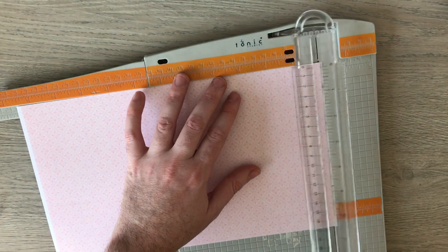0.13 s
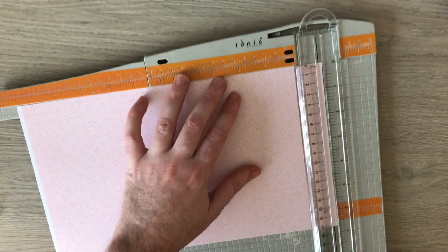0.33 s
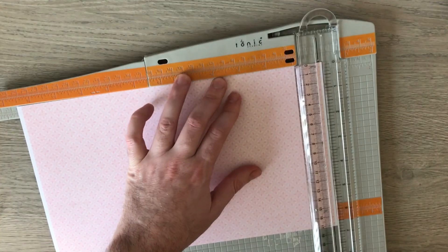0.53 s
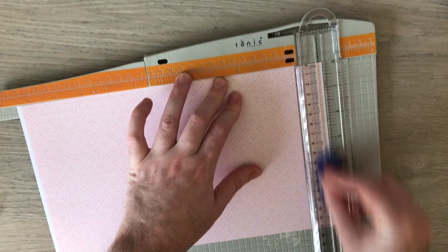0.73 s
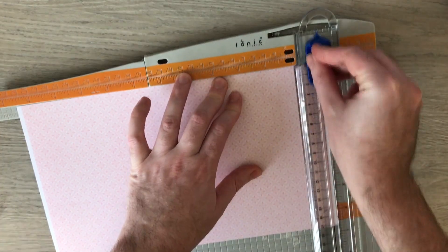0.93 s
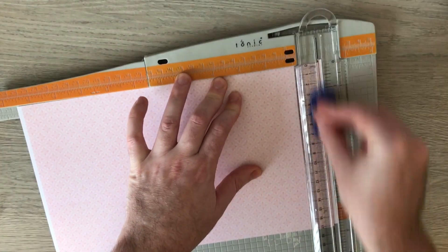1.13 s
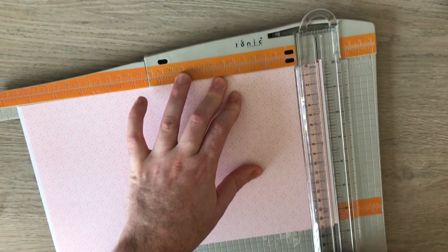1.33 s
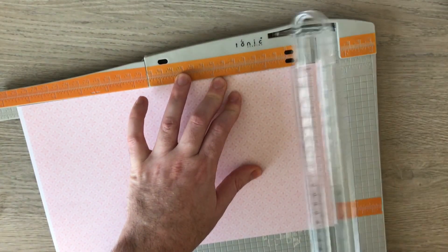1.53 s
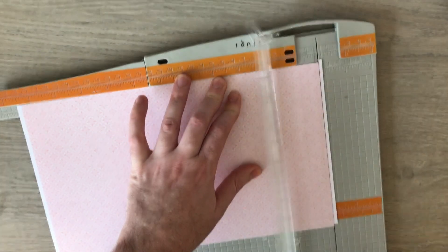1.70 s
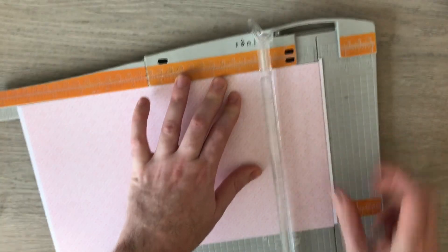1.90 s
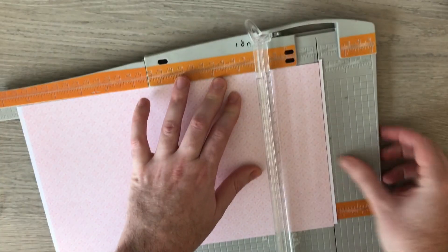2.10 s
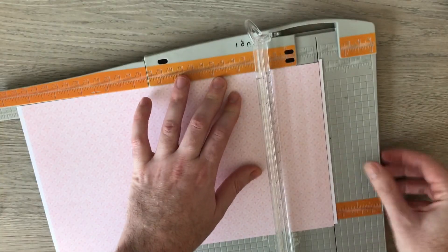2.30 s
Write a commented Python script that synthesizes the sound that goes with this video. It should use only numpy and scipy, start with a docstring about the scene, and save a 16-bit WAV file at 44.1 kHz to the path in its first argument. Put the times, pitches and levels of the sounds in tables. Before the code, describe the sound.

Paper trimmer, close up in a small room. A faint squeak at 0.03 s, then a loud plastic snap with table thump at 0.24. Soft rail rubbing from 0.4, a crisp tearing slice from 0.68 to 0.97, hissing return slide until 1.5 with small clicks near 1.4. Unlatching clatter and low boom around 1.65-1.8, then scraping and card crackles until 2.2, fading into quiet air.

```python
"""In a small room, on a wooden table, someone works a sliding-blade paper trimmer, heard from close above.
The plastic guide arm squeaks and snaps shut; the blade carriage runs up its rail, slices card and slides back.
The arm is unlatched and swung open with a rattle, the cut sheet is pulled aside, and the table top booms below.
Rubbing and cutting are made of many tiny random slips, knocks of short noise bursts that ring the plastic,
and the boom of decaying sine waves set going by noise."""
import sys
import numpy as np
from scipy import signal
from scipy.fft import rfft, irfft
from scipy.io import wavfile
from scipy.ndimage import uniform_filter1d

SR = 44100
rng = np.random.default_rng(int(sys.argv[2]) if len(sys.argv) > 2 else 0)


def master(y):
    """Save y as 16-bit WAV."""
    cut = np.clip(np.atleast_2d(y).T, -1, 1)
    pcm = np.round(cut * 32767)  # scale
    wavfile.write(sys.argv[1], SR, pcm.astype(np.int16))


N = 103635  # samples, 2.35 s


def undb(db):
    """Turn decibels into a gain."""
    return 10 ** (np.asarray(db) / 20)


def unit(x):
    """Scale a sound to an rms (average strength) of 1."""
    return x / np.sqrt(np.mean(x ** 2))


def curve(table, axis=1):
    """Draw a gain over time through one column of dB points, silent outside them."""
    rows = np.array(table)
    seconds = np.arange(N) / SR
    return undb(np.interp(seconds, rows[:, 0], rows[:, axis], left=-140, right=-140))


def response(points, peaks=(), tilt_db=0, size=4096):
    """Build the ringing of a body, with unit energy, from a tone colour, resonances and a treble tilt."""
    hz = np.maximum(np.arange(size // 2 + 1) * SR / size, 1)
    rows = np.array(points)
    db = np.interp(np.log(hz), np.log(rows[:, 0]), rows[:, 1])
    # the tilt, in dB per octave, acts above 1 kHz
    db = db + tilt_db * np.log2(np.maximum(hz, 1000))
    # bass falls away below half the first frequency
    db = db - 10 * np.log10(1 + (rows[0, 0] / hz / 2) ** 4)
    for centre, width, lift in peaks:
        db = db + lift / (1 + (2 * (hz - centre) / width) ** 2)
    # minimum phase: the ringing starts as promptly as it can and never before the blow
    cepstrum = irfft(np.log(undb(db)))
    h = irfft(np.exp(rfft(2 * cepstrum[:size // 2], size)))
    return h / np.sqrt(np.sum(h ** 2))


def through(x, h):
    """Pass a sound through an impulse response."""
    return signal.fftconvolve(x, h)[:len(x)]


def fade(t, t60):
    """Die away exponentially, by 60 dB in t60 seconds."""
    return np.exp(-np.log(1000) * t / t60)


def burst(t60_low, t60_high, size=22050):
    """Make dense ringing from noise, with separate decays below and above about 4 kHz."""
    t = np.arange(size) / SR
    noise = rng.standard_normal(size)
    low = signal.sosfiltfilt(signal.butter(1, 4000, fs=SR, output="sos"), noise)
    return low * fade(t, t60_low) + (noise - low) * fade(t, t60_high)


def even_burst(t60_low, t60_high, size=11025):
    """A short noise burst with its energy evened over frequency, so the tone colour stays steady."""
    spectrum = rfft(burst(t60_low, t60_high))
    power = uniform_filter1d(np.abs(spectrum) ** 2, size=200)
    return irfft(spectrum * np.sqrt(np.mean(power) / power))[:size]


def add(out, at, x):
    """Mix a sound in at a time in seconds."""
    i = int(at * SR)
    out[i:i + len(x)] += x[:N - i]


def walk(rate):
    """Wander smoothly at random, with rms 1, drawing new values at a rate per second."""
    k = max(int(SR / rate), 1)
    steps = np.repeat(rng.standard_normal(N // k + 1), k)[:N]
    return unit(uniform_filter1d(steps, k))


# Resonances of the plastic trimmer. Each row: frequency in Hz, width in Hz, lift in dB.
PLASTIC = [(559, 8.1, 6), (628.4, 7.8, 7), (716.8, 16, 12), (825, 73, 4.5), (1023, 79, 5), (1144, 60, 2),
           (1386, 110, 9), (1764, 99, 7), (1882, 40, 5), (2062, 87, 5.5), (2350, 60, 0.5), (2853, 79, 5),
           (3180, 210, 0.5), (3920, 90, -2.5), (4890, 120, -6), (5100, 200, 1), (5910, 250, 3),
           (8800, 430, 5.5)]


def friction(colour, rate, spread_db, uneven_db, uneven_rate):
    """Tiny slips of uneven size and pressure, at a rate per second, ring the trimmer."""
    sizes = undb(spread_db * rng.standard_normal(N))
    slips = (rng.random(N) < rate / SR) * rng.choice([-1, 1], N) * sizes
    pressure = undb(uneven_db * walk(uneven_rate))
    return unit(through(slips * pressure, response(colour, PLASTIC)))


def clicks(events, colour, treble_share):
    """Short contacts ring the plastic, each with its own brightness and length."""
    out = np.zeros(N)
    for at, db, tilt, t60 in events:
        contact = even_burst(t60, t60 * treble_share)
        add(out, at, undb(db) * through(contact, response(colour, PLASTIC, tilt)))
    return out


def patchy(x, depth_db, rate, count=9):
    """A moving contact favours now one band, now another, so the band levels wander."""
    out = x
    edges = np.geomspace(700, 11000, count + 1)
    for band in zip(edges[:-1], edges[1:]):
        part = signal.sosfiltfilt(signal.butter(2, band, "bandpass", fs=SR, output="sos"), x)
        out = out + part * (undb(depth_db * walk(rate)) - 1)
    return out


# Tone of the quiet air. Each row: frequency in Hz, relative level in dB.
AIR_COLOUR = [(45, -0.5), (90, -3.5), (200, -8.5), (400, -13.5), (800, -18.5), (1400, -19), (2500, -26),
              (5000, -27.5), (10000, -32), (15500, -33)]
AIR_DB = -64.5


def quiet_air():
    """Steady noise, strongest in the bass, fills the room."""
    return undb(AIR_DB) * unit(through(rng.standard_normal(N), response(AIR_COLOUR)))


TABLE_CUT_HZ = 90  # the table top radiates little below its lowest mode
# Ways the table top can ring. Each row: frequency in Hz, time to fade by 60 dB in seconds, relative level in dB.
TABLE = [(127, 0.16, -20.5), (131.2, 0.28, 0), (151, 0.033, -18.5), (210, .22, -2.5), (278.3, .14, -10)]


def table_ring(modes=TABLE):
    """One blow sets the table top ringing as a sum of fading sine waves."""
    t = np.arange(SR // 2) / SR
    ring = sum(undb(db) * np.sin(2 * np.pi * hz * t) * fade(t, t60) for hz, t60, db in modes)
    return signal.sosfilt(signal.butter(3, TABLE_CUT_HZ, "highpass", fs=SR, output="sos"), ring)


UPPER_MODES_HZ = 180  # where the upper modes begin
# Ringing of the table under the hands. Each row: time in seconds, lowest modes in dB, upper modes in dB.
BOOM = [(0, -60.5, -67.5), (.19, -73, -73.5), (.3, -42, -44.5), (.44, -72, -65.5), (.53, -52.5, -68),
        (.62, -57.5, -60.5), (.71, -36.5, -50), (.8, -50, -54.5), (.92, -54, -47), (.985, -39.5, -47),
        (1.1, -64, -64), (1.24, -43.5, -50.5), (1.45, -51, -64), (1.53, -56, -57.5), (1.63, -56, -65.5),
        (1.72, -30, -40), (1.9, -35.5, -41), (1.95, -38.5, -59), (2.0, -35, -38.5), (2.08, -37, -47),
        (2.115, -60, -39.5), (2.18, -40, -47), (2.34, -63.5, -66)]


def table_boom():
    """Handling keeps the table top ringing; where the hands press shifts the weight among its modes."""
    out = 0
    lowest = [m for m in TABLE if m[0] < UPPER_MODES_HZ]
    upper = [m for m in TABLE if m[0] >= UPPER_MODES_HZ]
    for column, modes in enumerate([lowest, upper]):
        ring = through(rng.standard_normal(N), table_ring(modes))
        # even out the random swells so that the curve sets the level
        swell = np.sqrt(uniform_filter1d(ring ** 2, size=2200) + 1e-9)
        out = out + curve(BOOM, axis=column + 1) * ring / swell
    return out


SQUEAK_AT_S, SQUEAK_LENGTH_S = .034, .028  # middle; length between points at a fifth of the peak
SQUEAK_HZ, SQUEAK_DB = 950, -44.5
SQUEAK_OCTAVE_DB, SQUEAK_RASP_DB = -21, -12  # relative to the squeak's main tone
SQUEAK_RING_DB, SQUEAK_RING_T60_S = -14.5, .3  # ring level, also relative to the main tone
# The arm brushing down on its hinge. Each row: time in seconds, level in dB.
SWING = [(0, -63), (.06, -71), (.1, -73.5), (.17, -77), (.195, -65), (.213, -58.5), (.24, -50),
         (.25, -72.5)]
# Tone of the hinge rub. Each row: frequency in Hz, relative level in dB.
HINGE_COLOUR = [(200, 0.5), (500, -6), (1000, 4.5), (1480, -4), (1750, -12.5), (2100, -10), (2700, -16.5),
                (5000, -23), (16000, -36.5)]


def hinge():
    """The arm comes down with a faint, wavering squeak that rings on, and a soft rub."""
    t = np.arange(N) / SR
    phase = 2 * np.pi * np.cumsum(SQUEAK_HZ * (1 + .012 * walk(200))) / SR
    rub = friction(HINGE_COLOUR, rate=2500, spread_db=5, uneven_db=2.5, uneven_rate=100)
    squeak = np.sin(phase) + undb(SQUEAK_OCTAVE_DB) * np.sin(2 * phase)
    squeak = squeak + undb(SQUEAK_RASP_DB) * rub
    swell = np.exp(-2 * np.pi * ((t - SQUEAK_AT_S) / SQUEAK_LENGTH_S) ** 2)
    after = np.maximum(t - SQUEAK_AT_S - SQUEAK_LENGTH_S / 2, 0)
    ring = undb(SQUEAK_RING_DB) * np.sin(2 * np.pi * SQUEAK_HZ * after)
    ring = ring * fade(after, SQUEAK_RING_T60_S)
    return undb(SQUEAK_DB) * (swell * squeak + ring) + curve(SWING) * rub


ROOM_DELAY_S = .006  # wait before the room answers
SNAP_T60_LOW_S, SNAP_T60_HIGH_S = 0.047, 0.016
THUMP_DAMPING_T60_S = 0.52  # extra fade: the hand on the card damps the thump
ECHO_DB, ECHO_T60_LOW_S, ECHO_T60_HIGH_S = -28, 0.39, .25
# The arm snapping shut: first touch, latch and seating.
# Each row: start in seconds, level in dB, table thump in dB.
SNAP = [(0.2182, -48, -60.5), (0.2312, -43.5, -61.5), (.2412, -5.5, -18.5), (0.242, -8.5, -37.5)]
# Tone of the snap. Each row: frequency in Hz, relative level in dB.
SNAP_COLOUR = [(150, 7), (260, -2.5), (450, -13), (700, -3), (1050, 8.5), (1400, -2.5), (2500, 2),
               (4000, 0), (6000, 0), (8700, -7), (10400, -12.5), (12500, -4.5), (16000, -13)]
# Tone of the room's answer to the snap. Each row: frequency in Hz, relative level in dB.
ECHO_COLOUR = [(150, 3.5), (450, -2.5), (1100, 6), (2000, 0.5), (3500, -2.5), (6000, -4.5), (8700, -10.5),
               (10400, -17), (12500, -14), (16000, -22)]


def arm_snap():
    """The arm clicks into its latch and thumps the table; the room returns a diffuse wash."""
    out = np.zeros(N)
    plastic = response(SNAP_COLOUR, PLASTIC)
    thump = table_ring()
    thump = thump * fade(np.arange(len(thump)) / SR, THUMP_DAMPING_T60_S)
    for at, db, thump_db in SNAP:
        add(out, at, undb(db) * through(even_burst(SNAP_T60_LOW_S, SNAP_T60_HIGH_S), plastic))
        add(out, at, undb(thump_db) * thump)
    wash = through(burst(ECHO_T60_LOW_S, ECHO_T60_HIGH_S), response(ECHO_COLOUR))
    add(out, SNAP[-1][0] + ROOM_DELAY_S, undb(ECHO_DB) * wash)
    return out


# The carriage on its rail, up and back. Each row: time in seconds, rubbing in dB, hiss in dB.
RAIL = [(.38, -77, -91), (.43, -57.5, -63), (.52, -50.5, -55.5), (.6, -46, -49.5), (.675, -51.5, -47),
        (.8, -55, -40.5), (.955, -44, -46), (.99, -60, -78), (1.06, -53.5, -58.5), (1.15, -51, -55.5),
        (1.18, -50.5, -50.5), (1.26, -48.5, -43.5), (1.34, -50, -47), (1.405, -44.5, -48.5),
        (1.48, -51.5, -56), (1.525, -65, -87), (1.6, -61.5, -85)]
# Tone of the rubbing. Each row: frequency in Hz, relative level in dB.
RUB_COLOUR = [(55, 4.5), (200, -9), (350, -6), (480, -11.5), (750, -1.5), (1100, -1.5), (1900, -3.5),
              (2600, -9), (4500, -12), (9000, -28), (16000, -57)]
# Tone of the hiss. Each row: frequency in Hz, relative level in dB.
HISS_COLOUR = [(500, -8.5), (2000, -8.5), (3300, 2), (4800, -1.5), (6200, 4.5), (8200, -3), (9400, -0.5),
               (10700, -4), (13000, 3), (16000, -2)]


def carriage():
    """The carriage rubs along the rail in sparse slips and hisses in dense ones."""
    rub = friction(RUB_COLOUR, rate=1500, spread_db=2, uneven_db=1.0, uneven_rate=52)
    hiss = friction(HISS_COLOUR, rate=18000, spread_db=1.5, uneven_db=1.5, uneven_rate=120)
    return rub * curve(RAIL) + hiss * curve(RAIL, axis=2)


FIBRES_PER_S, FIBRE_SPREAD_DB = 9000, 3
# The blade in the card. Each row: time in seconds, level in dB.
CUT = [(.676, -78), (.69, -36), (.712, -32), (.77, -35), (.81, -33.5), (.86, -33), (.91, -36.5),
       (.962, -47), (.978, -68)]
# Tone of the cut. Each row: frequency in Hz, relative level in dB.
CUT_COLOUR = [(55, 5.5), (200, 2.5), (450, -4.5), (900, 2), (1500, 1.5), (2100, -2.5), (3300, 2.5),
              (4600, -5.5), (6500, -2.5), (7700, -6), (9000, -6), (10400, -7.5), (12000, -1), (15500, -1)]


def blade():
    """The blade parts the fibres of the card, each giving a tiny slip."""
    return curve(CUT) * friction(CUT_COLOUR, FIBRES_PER_S, FIBRE_SPREAD_DB, uneven_db=0.5, uneven_rate=200)


# Coarse tearing of the card ahead of the blade. Each row: time in seconds, level in dB.
TEAR = [(.68, -77), (.695, -37), (.745, -44), (.785, -49), (.82, -42), (.865, -37), (.92, -39), (.965, -50),
        (.985, -75)]
# Tone of the tearing. Each row: frequency in Hz, relative level in dB.
TEAR_COLOUR = [(500, -16.5), (1000, -6.5), (1450, 4.5), (2100, 4), (3200, -6.5), (4500, -8.5),
               (9000, -22.5), (16000, -24)]


def tearing():
    """Bundles of fibres give way in coarser snaps, fewer per second than the blade's slips."""
    return curve(TEAR) * friction(TEAR_COLOUR, rate=1900, spread_db=3, uneven_db=2, uneven_rate=130)


# Plastic knocks: the carriage coming home, then the arm unlatching and swinging open.
# Each row: start in seconds, level in dB, tilt in dB per octave, time to fade by 60 dB in seconds.
KNOCKS = [(1.3600, -42, -4, .06), (1.3790, -36, 1.5, .04), (1.4450, -41, -6, .04), (1.4490, -33, -5, 0.047),
          (1.6300, -44.5, 0, 0.043), (1.6380, -40, -12, .08), (1.6530, -31.5, -10, 0.096),
          (1.6740, -32.5, -12, 0.082), (1.6962, -20.5, 1.5, 0.049), (1.6990, -17.5, 1, .07),
          (1.7085, -14.5, -.5, .06), (1.7220, -18, 0.5, 0.037), (1.7565, -20, -1, 0.052),
          (1.7730, -35, 3, 0.051), (1.7880, -36, -3, 0.048), (1.8040, -31.5, 3, .06),
          (1.8270, -38, -5, .05), (1.9000, -36, -9, .05), (1.9250, -28, -4, 0.037)]
# Tone of the knocks. Each row: frequency in Hz, relative level in dB.
KNOCK_COLOUR = [(200, -2), (450, -7.5), (900, 0), (1900, 0), (3000, -5), (5500, -9.5), (8500, -15.5),
                (10400, -18), (12500, -18.5), (16000, -22)]


def knocks():
    """Plastic parts knock together and ring briefly, the treble dying sooner."""
    return clicks(KNOCKS, KNOCK_COLOUR, treble_share=0.78)


# Arm and card sliding as they are moved aside. Each row: time in seconds, level in dB.
SLIDE = [(1.625, -64), (1.645, -50), (1.69, -46), (1.73, -30.5), (1.83, -37.5), (1.9, -32), (1.96, -42),
         (2.005, -38.5), (2.03, -49.5), (2.08, -38.5), (2.13, -44.5), (2.2, -46), (2.26, -64),
         (2.35, -68.5)]
# Tone of the sliding. Each row: frequency in Hz, relative level in dB.
SLIDE_COLOUR = [(200, -5), (450, -4.5), (800, -1), (1400, 0.5), (2100, -4.5), (3200, -9.5), (5500, -13.5),
                (8000, -23), (10400, -25), (16000, -28)]


def sheet():
    """Arm and card scrape over the base in small catches."""
    return curve(SLIDE) * friction(SLIDE_COLOUR, rate=3500, spread_db=2.5, uneven_db=2.6, uneven_rate=110)


# Crackles of the card as it is caught and lifted.
# Each row: start in seconds, level in dB, tilt in dB per octave, time to fade by 60 dB in seconds.
CRACKLES = [(1.8565, -26, -0.5, 0.13), (1.8700, -31.5, 4.5, 0.12), (1.8820, -48, 0, .04),
            (1.9410, -34, -1, .04), (1.9625, -30.5, -1.5, 0.088), (1.9820, -33, -1, 0.031),
            (1.9970, -29, -7, 0.066), (2.0140, -37, -3, .03), (2.0490, -25, -4.5, 0.082),
            (2.0550, -31.5, 6.5, 0.046), (2.0630, -30, -2.5, 0.082), (2.1060, -33, -0.5, 0.17),
            (2.1210, -34, -4, 0.099), (2.1710, -40, -7, .05), (2.2793, -48, 0.5, 0.038)]
# Tone of the card. Each row: frequency in Hz, relative level in dB.
CARD_COLOUR = [(200, -5), (450, -14), (900, 1), (1900, 4), (3000, 1.5), (5500, -3), (8500, -11),
               (10400, -18.5), (12500, -11.5), (16000, -23)]


def crackles():
    """The card crackles in short contacts whose treble dies sooner."""
    return clicks(CRACKLES, CARD_COLOUR, treble_share=0.63)


ROOM_T60_LOW_S, ROOM_T60_HIGH_S, ROOM_DB = 0.5, 0.48, -15.5
# Tone of the room echo. Each row: frequency in Hz, relative level in dB.
ROOM_COLOUR = [(100, -4.5), (1000, 1), (5000, -1.5), (9000, -4.5), (16000, -4)]


def room_echo(dry):
    """The small room answers after a short delay with a dense, fading tail of echoes."""
    tail = through(burst(ROOM_T60_LOW_S, ROOM_T60_HIGH_S), response(ROOM_COLOUR))
    tail = tail / np.sqrt(np.sum(tail ** 2))
    room = np.zeros(N)
    add(room, ROOM_DELAY_S, through(dry, tail))
    return undb(ROOM_DB) * room


def scene():
    """Mix all sources; the snap has its own echo and the table boom has none."""
    moving = patchy(carriage() + blade() + tearing() + sheet(), depth_db=1.8, rate=28)
    dry = hinge() + moving + knocks() + crackles()
    mix = dry + room_echo(dry) + arm_snap() + table_boom() + quiet_air()
    return mix[None]


LOW_CUT_HZ, TOP_HZ = 34, 15800


def record(dry):
    """The microphone clips at full scale, drops the deepest bass and cuts the top."""
    clipped = np.clip(dry, -1, 1)
    lean = signal.sosfilt(signal.butter(4, LOW_CUT_HZ, "highpass", fs=SR, output="sos"), clipped)
    return signal.sosfilt(signal.ellip(10, .2, 80, TOP_HZ, fs=SR, output="sos"), lean)


dry = scene()
out = record(dry)
master(out)
```